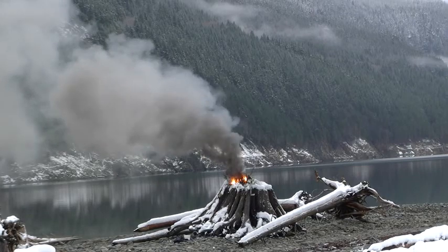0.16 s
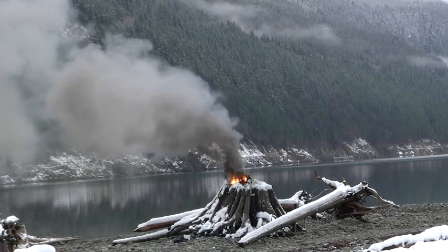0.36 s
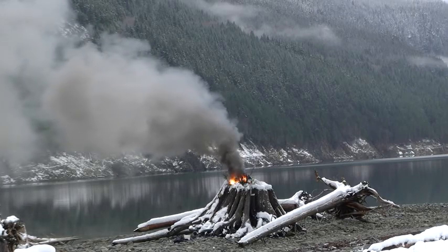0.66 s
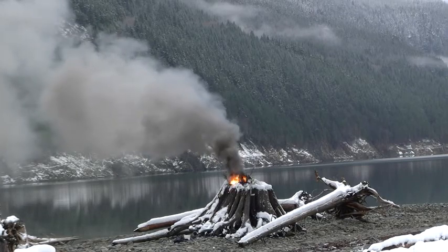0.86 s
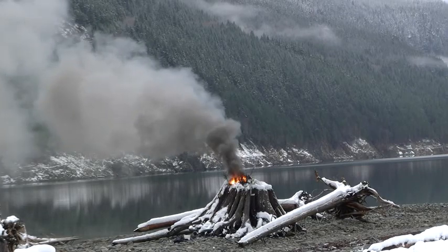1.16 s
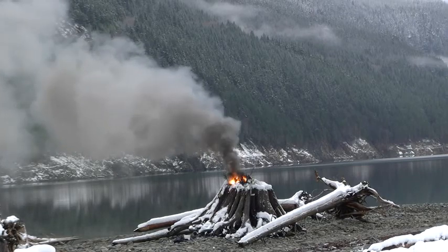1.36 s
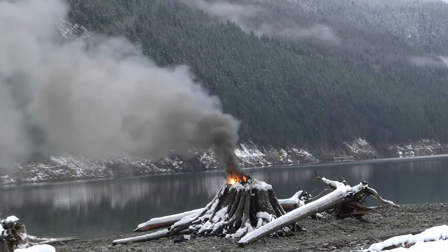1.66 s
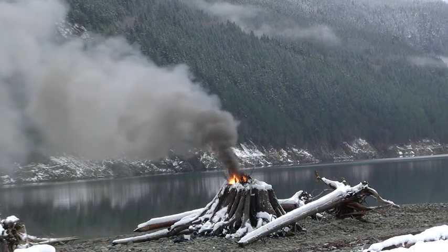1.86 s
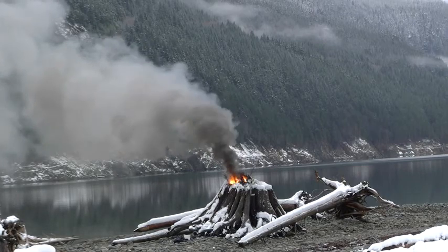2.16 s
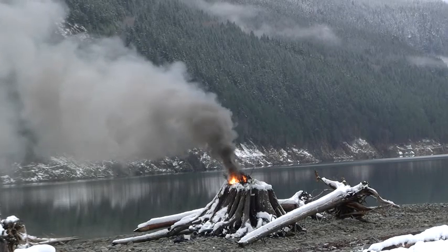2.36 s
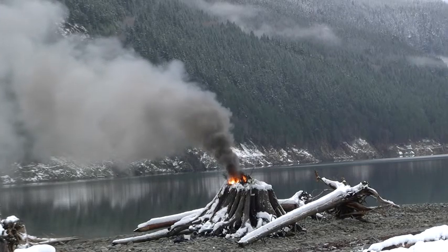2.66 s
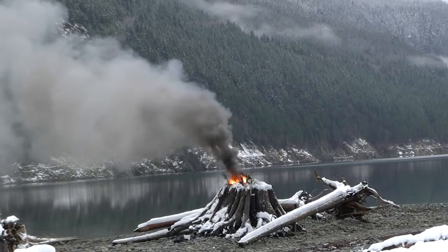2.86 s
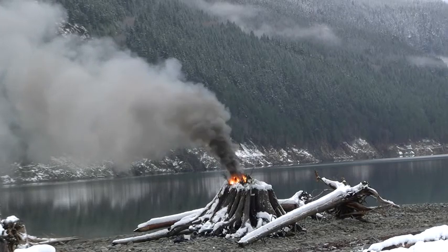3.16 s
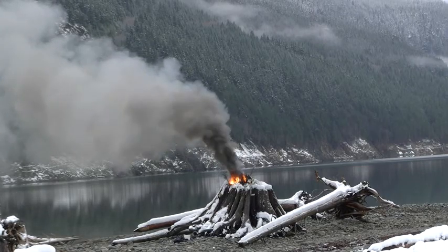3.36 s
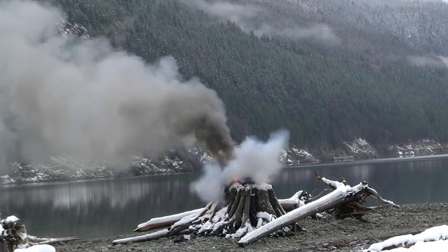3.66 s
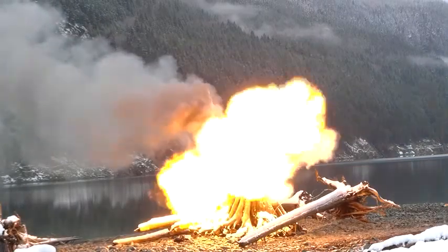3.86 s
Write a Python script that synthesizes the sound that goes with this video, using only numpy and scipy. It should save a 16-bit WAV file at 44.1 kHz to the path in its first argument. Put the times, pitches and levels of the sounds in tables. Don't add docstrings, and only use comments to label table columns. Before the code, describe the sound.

An explosion at about 3.77 s dominates: an instantaneous, hard-clipped crack that overloads the stereo microphone. Before it, a quiet open lakeshore: soft steady water rush, faint fire hiss with small dry crackles from 0.7 s, tiny low wind bumps near 0.75 and 1.25 s. After the crack, rapid low pressure thumps, heavier on the right, bright debris spray and rough gas roar with echoes until the cut at 4 s.

```python
import sys
import numpy as np
from scipy import signal
from scipy.fft import rfft, irfft
from scipy.io import wavfile
from scipy.ndimage import uniform_filter1d

SR = 44100
rng = np.random.default_rng(int(sys.argv[2]) if len(sys.argv) > 2 else 0)


def volts_from_db(level):
    exponent = np.asarray(level, float) / 20
    return 10 ** exponent


def file_out(sig):
    cols = np.atleast_2d(sig).T
    lim = np.clip(cols, -1, 1)
    pcm = np.round(lim * 32767).astype(np.int16)
    wavfile.write(sys.argv[1], SR, pcm)


N = 176400
T = np.arange(N) / SR

# arrival in seconds, peak in dB.
SHOCK_FRONTS = [
    (3.7687, 17.5),
    (3.7722, -20),
    (3.7779, -13),
    (3.7884, -3),
]
# pitch in Hz, level in dB, 60 dB decay in seconds.
MIC_RINGS = [(2440, 2, 0.0029), (6710, -11.5, 0.0036), (1650, -6, 0.0051), (3200, -18.5, 0.0063),
             (1100, -16.5, 0.0052)]
# centre in seconds, peak in dB, half width in seconds.
PRESSURE_WAVES = [(3.7764, -5, 0.0008), (3.782, -8.5, 0.00073), (3.7853, -9, 0.00047),
                  (3.7903, -2.5, 0.00088), (3.7933, -11, 0.00098), (3.8015, -9.5, 0.0014),
                  (3.8068, -13, 0.0014), (3.816, -21, .003), (3.83, -25, 0.0027), (3.851, -16.5, 0.0013),
                  (3.88, -22, 0.0017), (3.903, -16.5, 0.0015), (3.917, -9, .0022), (3.9233, -16, 0.0019),
                  (3.932, -17, 0.0025), (3.9477, -9, .002), (3.96, -12, 0.0031), (3.9687, -11, 0.0015),
                  (3.982, -18, .002), (3.9975, -15.5, 0.00071)]
# centre in seconds, depth in dB, half width in seconds.
RAREFACTIONS = [
    (3.7753, -1, 0.00028),
    (3.7792, -19, .0013),
    (3.792, -11, 0.00033),
    (3.7972, -7, 0.0012),
    (3.811, -14.5, 0.0013),
    (3.9275, -10, 0.0017),
    (3.939, -15, 0.0021),
    (3.973, -15, 0.0016),
    (3.911, -16, .003),
    (3.7888, -2, 0.00036),
]
# time in seconds, level in dB.
ROAR_LEVEL = [(3.769, -17), (3.78, -21), (3.79, -16), (3.802, -29), (3.826, -37), (3.843, -29.5),
              (3.93, -30), (3.975, -35), (4., -31.5)]
# frequency in Hz, density in dB per Hz.
ROAR_COLOUR = [(30, -10), (90, 0), (400, -11), (1000, -9.5), (2500, -13), (5000, -19), (11000, -31),
               (15500, -50)]
# frequency in Hz, likeness from 0 to 1.
ROAR_ALIKE = [(60, .96), (290, 0.83), (640, 0.7), (1410, 0.63), (3100, 0.56), (6820, .06), (15000, .01)]
# frequency in Hz, left over right in dB.
ROAR_LEAN = [(60, -5), (250, -5.5), (1000, -4), (3000, -2.8), (15000, -2)]
# centre in seconds, level in dB, length in seconds.
DEBRIS_SHOWERS = [
    (3.7727, -18, 0.0037),
    (3.7793, -16, .001),
    (3.782, -34, .003),
    (3.7876, -8, 0.001),
    (3.7897, -21, 0.0013),
]
# time in seconds, level in dB.
FLAME_LEVEL = [(0, -62.5), (.2, -63.5), (.5, -70), (.83, -66), (.89, -61), (.96, -69), (1.2, -65),
               (1.45, -65.5), (1.75, -61.5), (2.05, -61.5), (2.4, -58.5), (2.5, -65), (2.65, -61.5),
               (2.95, -63.5), (3.2, -63.5), (3.75, -70)]
# start in seconds, peak in dB, pitch in Hz.
CRACKLES = [(.737, -37, 9600), (.865, -45, 4700), (.894, -42.5, 5500), (.909, -45, 5200),
            (1.097, -40, 4600), (1.381, -39, 7400), (1.428, -45, 5500), (1.487, -48, 4900),
            (1.663, -50, 5500), (1.69, -43, 6000), (1.732, -40, 5400), (1.8, -45, 5800), (1.893, -46, 5600),
            (1.983, -45, 10500), (2.003, -42, 5300), (2.068, -45, 6100), (2.18, -43, 8500),
            (2.345, -43, 5700), (2.379, -36.5, 5370), (2.419, -43, 6000), (2.713, -37, 5800),
            (2.791, -44, 6000), (2.857, -38.5, 7000), (2.987, -44, 5500), (3.524, -48, 4600),
            (3.579, -44, 5900), (3.68, -45, 5000), (3.736, -46, 6500)]
# centre in seconds, peak in dB, half width in seconds.
WIND_PUFFS = [
    (.745, -51, 0.0054),
    (1.249, -56, 0.0047),
    (2.924, -61, 0.0038),
]
# frequency in Hz, density in dB per Hz.
WATER_COLOUR = [(22, -24), (60, -9), (170, -8.5), (280, -1.5), (600, -0.5), (1400, -4.5), (4000, -19),
                (15500, -35.5)]
# frequency in Hz, likeness from 0 to 1.
WATER_ALIKE = [(60, 0.01), (130, .02), (290, 0.66), (640, 0.66), (3100, 0.48), (6820, 0.33), (15000, 0.11)]
# frequency in Hz, left over right in dB.
WATER_LEAN = [(60, -3.5), (380, -4.5), (700, -1.5), (15000, -2.5)]
# multiple of the base pitch, level in dB.
WHINE_OVERTONES = [(4, -6), (5, -6), (6, -1), (7, 0)]
# centre in Hz, width in Hz, depth from 0 to 1.
HOUSING_DIPS = [(4600, 210, 0.27), (4900, 600, 0.44), (7700, 500, 0.2), (15300, 1500, .3)]

CLAMP_S = 3.7694
LEFT_RIGHT = np.array([[1], [-1]])


def level(x, db):
    return x * volts_from_db(db) / np.sqrt(np.mean(x ** 2))


def curve(table, at):
    return np.interp(at, *np.array(table)[:, :2].T)


def on_log(table, hz):
    table_hz, values = np.array(table)[:, :2].T
    return np.interp(np.log(hz + 1), np.log(table_hz), values)


def walk(rate):
    hold = int(SR / rate)
    steps = np.repeat(rng.standard_normal(N // hold + 1), hold)
    return 1.63 * uniform_filter1d(uniform_filter1d(steps, hold), hold)[:N]


def band(x, hz, width_hz):
    return signal.lfilter(*signal.iirpeak(hz, hz / width_hz, SR), x)


def band_twice(x, hz, width_hz):
    return band(band(x, hz, width_hz), hz, width_hz)


def wide(colour, alike, lean, flicker_db, rate):
    hz = np.fft.rfftfreq(N, 1 / SR)
    mid, side = rfft(rng.standard_normal((2, N)))
    likeness = np.clip(on_log(alike, hz), 0, 1)
    spectrum = mid * np.sqrt(1 + likeness) + LEFT_RIGHT * side * np.sqrt(1 - likeness)
    spectrum = spectrum * volts_from_db(on_log(colour, hz) + LEFT_RIGHT * on_log(lean, hz) / 2)
    octave = np.log2(hz / 30 + 1e-9)
    out = np.zeros((2, N))
    for k in range(10):
        share = np.sqrt(np.clip(1 - abs(octave - k), 0, 1))
        out += irfft(spectrum * share, N) * volts_from_db(flicker_db * walk(rate))
    return level(out, 0)


def push(s, db, half_s):
    suction, spread = 0.81, 2.9
    u = ((T - s) / half_s) ** 2
    shape = np.exp(-u) - suction / spread * np.exp(-u / spread ** 2)
    return volts_from_db(db) * shape / (1 - suction / spread)


def shock():
    port_lag_s = np.array([[0], [.00004]])
    out = np.zeros((2, N))
    for s, db in SHOCK_FRONTS:
        t = np.clip(T - s - port_lag_s, 0, 1)
        for hz, ring_db, t60 in MIC_RINGS:
            out -= volts_from_db(db + ring_db) * np.sin(2 * np.pi * hz * t) * volts_from_db(-60 * t / t60)
    return out


def pressure_waves():
    waves = sum(push(*row) for row in PRESSURE_WAVES) - sum(push(*row) for row in RAREFACTIONS)
    edges = signal.lfilter(*signal.butter(1, 600, "high", fs=SR), waves)
    left = volts_from_db(-9.5) * waves + volts_from_db(-16) * edges
    return np.array([left, waves])


def gas_roar():
    grain_per_s, spread_db = 1500, 4.2
    size = volts_from_db(np.minimum(spread_db * rng.exponential(size=(2, N)), 14))
    grains = (rng.random(N) < grain_per_s / SR) * size * rng.standard_normal((2, N))
    grit = level(band_twice(grains, 3600, 5500), -9.5)
    body = wide(ROAR_COLOUR, ROAR_ALIKE, ROAR_LEAN, 1.5, 150) + grit
    return body * volts_from_db(curve(ROAR_LEVEL, T) + 2.5)


def debris():
    showers = sum(volts_from_db(db) * np.exp(-((T - s) / length_s) ** 2) for s, db, length_s in DEBRIS_SHOWERS)
    return level(band_twice(rng.standard_normal((2, N)), 6500, 9000), -5.0) * showers


def flame_hiss():
    spit_per_s, spread_db = 660, 5
    size = volts_from_db(np.minimum(spread_db * rng.exponential(size=N), 12))
    spits = (rng.random(N) < spit_per_s / SR) * size * rng.standard_normal(N)
    hiss = level(spits, -3.5) + 0.59 * rng.standard_normal(N) + 0.79 * rng.standard_normal((2, N))
    hiss = level(band_twice(hiss, 5600, 8700), -0.4)
    return hiss * volts_from_db(curve(FLAME_LEVEL, T) + 0.9 * walk(35))


def crackles():
    length, decay_s = 300, 0.0017
    out = np.zeros(N)
    for s, db, hz in CRACKLES:
        burst = rng.standard_normal(length) * np.exp(-T[:length] / decay_s)
        pop = band(band(burst, hz * 0.62, hz * 0.67), hz * 0.83, hz * 0.93)
        i = int(s * SR)
        out[i:i + length] += volts_from_db(db) * pop / abs(pop).max()
    return out


def fire():
    return (flame_hiss() + crackles()) * volts_from_db(-.8 * LEFT_RIGHT)


def wind_puffs():
    return sum(push(*row) for row in WIND_PUFFS)


def far_water():
    return volts_from_db(-45) * wide(WATER_COLOUR, WATER_ALIKE, WATER_LEAN, 0.34, 11)


def whine():
    base_hz = 2057.7
    return sum(volts_from_db(-89 + db) * np.sin(2 * np.pi * k * base_hz * T) for k, db in WHINE_OVERTONES)


def scene():
    shore = far_water() + fire() + wind_puffs()
    for hz, width_hz, depth in HOUSING_DIPS:
        shore = shore - depth * band(shore, hz, width_hz)
    below_top = np.fft.rfftfreq(N, 1 / SR) < 15750
    shore = irfft(rfft(shore + whine()) * below_top, N)
    shore = shore * volts_from_db(-20 * (T > CLAMP_S))
    after_blast = T > SHOCK_FRONTS[0][0]
    return shock() + pressure_waves() + after_blast * (gas_roar() + debris()) + shore


def low_pass(x):
    return signal.sosfilt(signal.butter(12, 16430, fs=SR, output="sos"), x)


def record(dry):
    ceiling_db, clamp_db, clamp_tau_s = -1., -6, .0015
    clamped = 1 - np.exp(-np.clip(T - CLAMP_S, 0, 1) / clamp_tau_s)
    top = volts_from_db(ceiling_db + clamp_db * clamped)
    x = dry / (1 + (dry / top) ** 6) ** (1 / 6)
    lost_treble = signal.lfilter(*signal.butter(2, 1200, "high", fs=SR), dry - x)
    x = x + 0.45 * (T > 3.7715) * lost_treble
    x = signal.sosfiltfilt(signal.ellip(6, .05, 40, 15900, fs=SR, output="sos"), x)
    return low_pass(x)


dry = scene()
out = record(dry)
file_out(out)
```